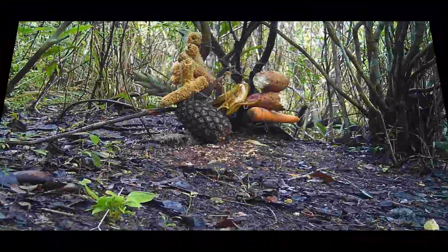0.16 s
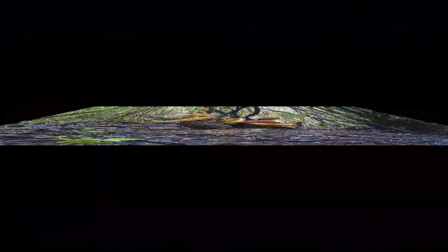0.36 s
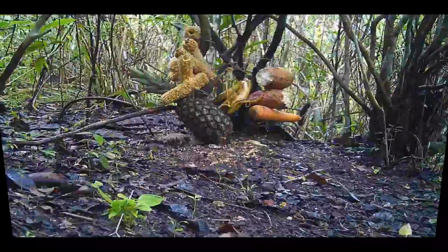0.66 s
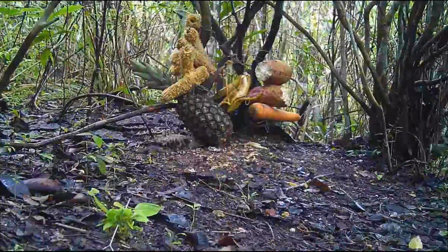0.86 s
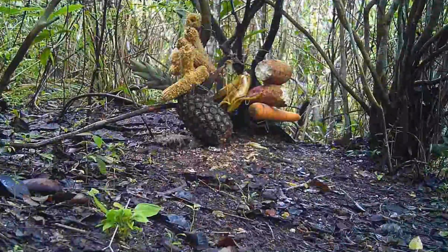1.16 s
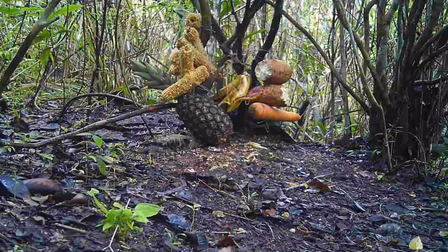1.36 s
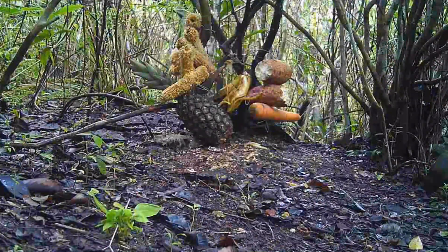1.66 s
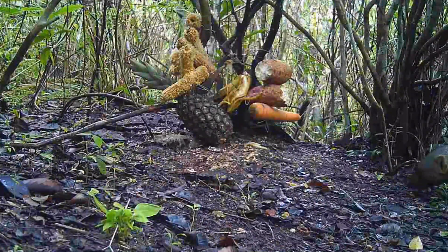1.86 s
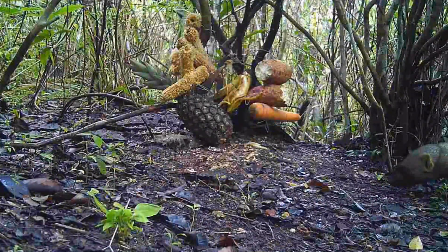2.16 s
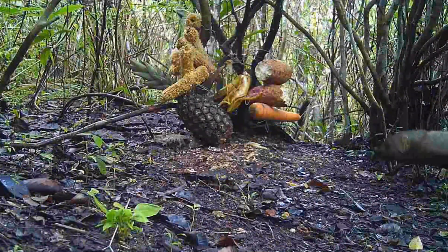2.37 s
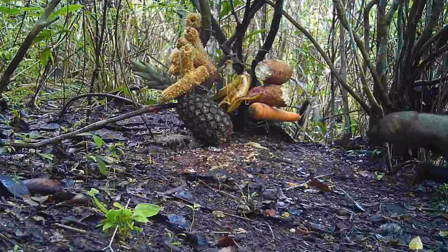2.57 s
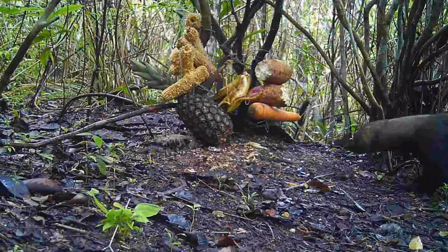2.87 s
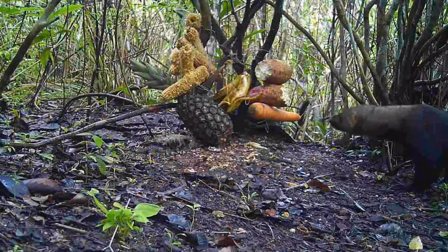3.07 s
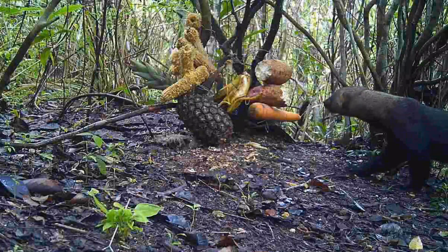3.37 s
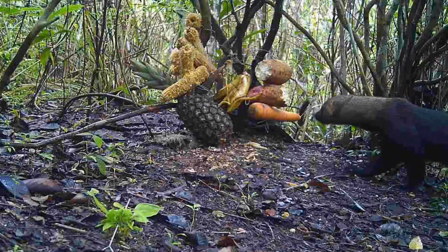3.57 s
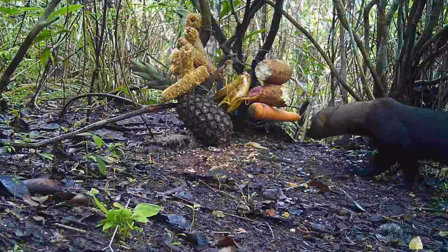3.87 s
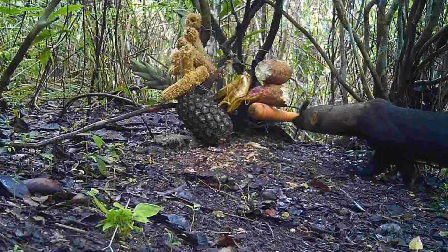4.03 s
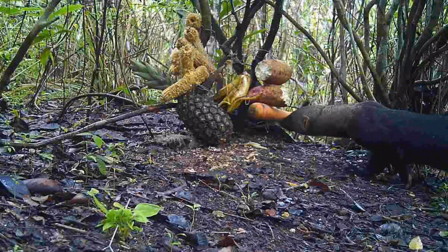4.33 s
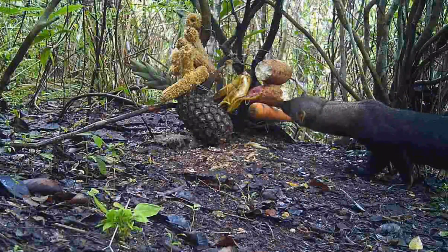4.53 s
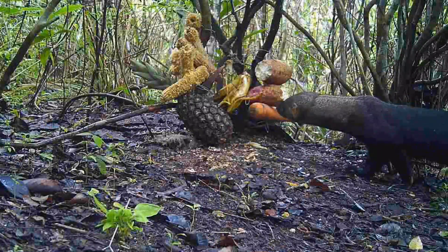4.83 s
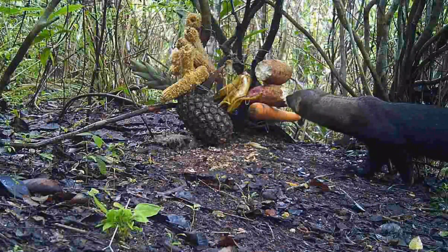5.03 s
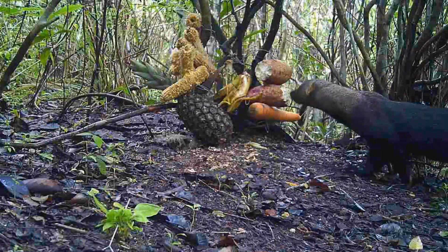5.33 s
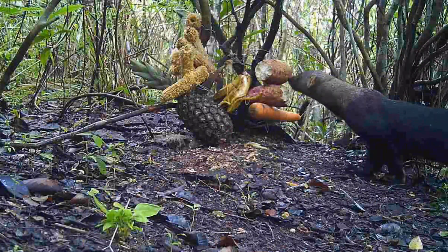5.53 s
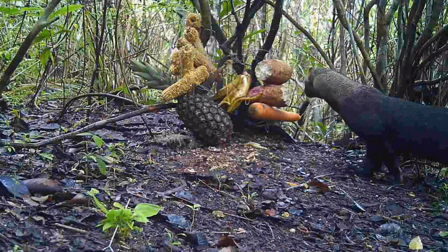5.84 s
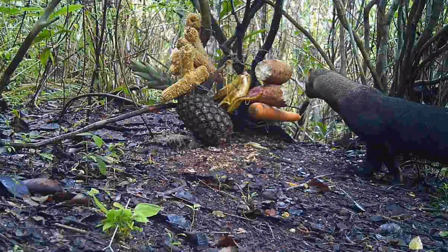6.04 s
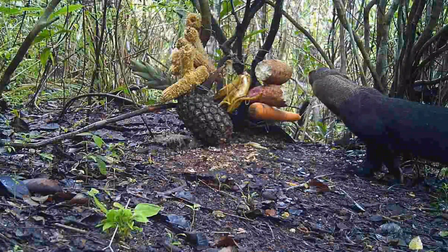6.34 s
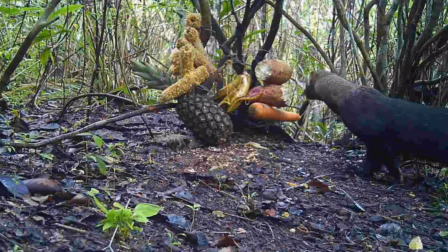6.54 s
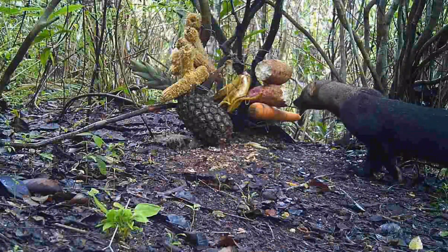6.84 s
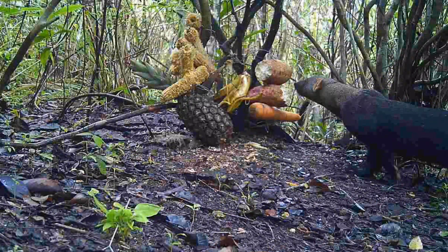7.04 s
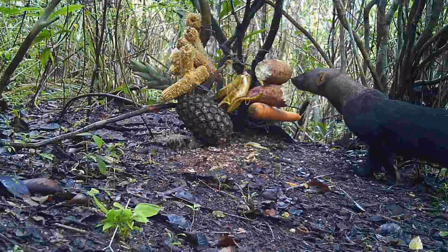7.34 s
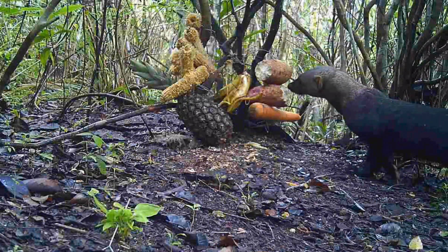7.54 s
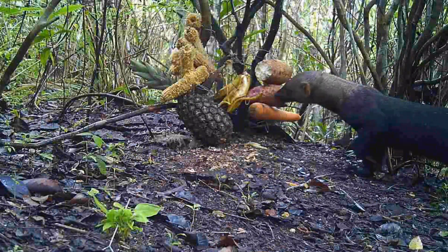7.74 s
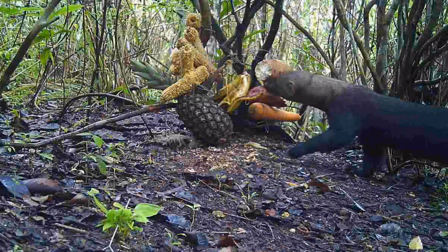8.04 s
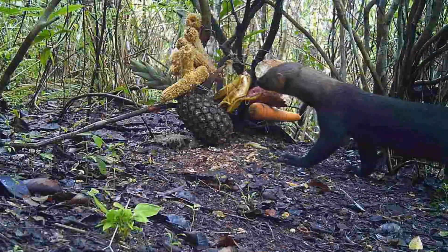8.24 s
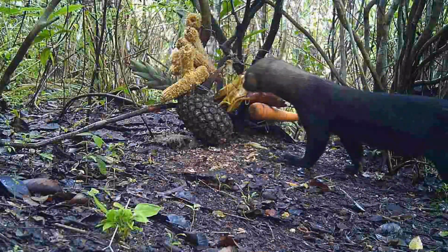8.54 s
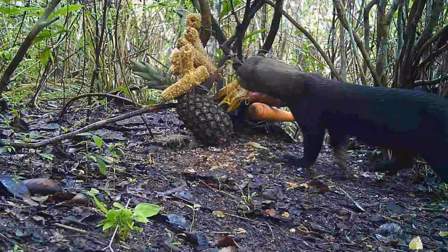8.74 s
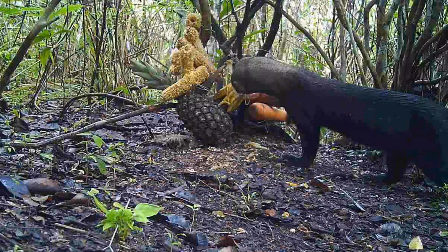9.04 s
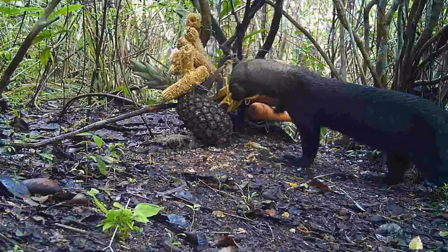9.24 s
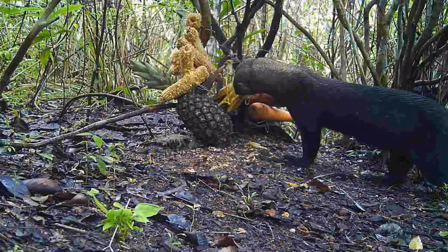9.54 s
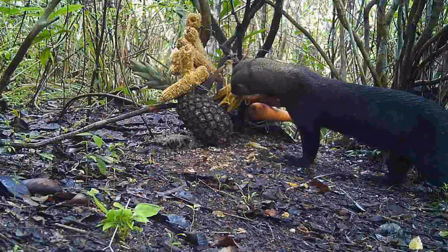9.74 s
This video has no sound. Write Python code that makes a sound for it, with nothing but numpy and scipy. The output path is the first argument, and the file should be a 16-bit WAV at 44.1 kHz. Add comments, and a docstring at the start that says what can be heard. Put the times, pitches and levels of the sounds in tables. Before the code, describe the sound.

Outdoor woodland ambience heard by a small, slightly hissy fixed microphone near the ground. Dense crickets shimmer and pulse irregularly without pause, above a soft low engine drone. Brief falling bird chips, tiny high squeaks and thin katydid buzzes appear in the opening seconds; light leaf crackles and dry twig ticks follow as an animal comes to feed. Late on, one bright descending whistle stands out, then a chip and more ticks.

```python
"""A forest floor. From the start a far engine hums over low rumble, the microphone hisses and a chorus of
crickets throbs near 3 kHz: sums of sines, shaped noise, and noise bursts ringing resonators.
At once a low bird chip and a faint falling whistle sound as gliding sines, and a thin buzz of harmonics
begins to pulse twice a second. A katydid buzzes in the first seconds, clicks driving wing resonances.
Leaf litter then rustles in ringing grains, twigs snap in short modes, and late on a strong whistle falls."""
import sys
import numpy as np
from scipy import signal
from scipy.fft import rfft, irfft
from scipy.io import wavfile

SR = 44100
rng = np.random.default_rng(int(sys.argv[2]) if len(sys.argv) > 2 else 0)


def output_pcm(signal):
    """Save a mono or channel-first signal as 16-bit PCM at the path in sys.argv[1].

    Samples are clipped to [-1, 1] before scaling.
    """
    pcm = np.clip(np.atleast_2d(signal).T, -1, 1) * 32767
    wavfile.write(sys.argv[1], SR, np.round(pcm).astype(np.int16))


N = 436590
TIME = np.arange(N) / SR

# Slow course of the background: (time [s], level [dB])
BACKGROUND_LEVEL = [(0.0, -58.5), (0.55, -59.5), (1.62, -55.5), (2.81, -55.5), (3.53, -57), (7.58, -56.5),
                    (8.02, -55), (8.55, -57.5), (9.9, -57)]
# Engine orders: (multiple of the engine rate [-], relative level [dB])
ENGINE_ORDERS = [(2.5, -19), (3, -.5), (4, -21), (5, -23), (6, -26), (8, -31), (9, -35), (12, -39)]
# Relative density of the rumble: (frequency [Hz], density [dB per Hz])
RUMBLE_SPECTRUM = [(4.7, -47), (8.0, -3), (27, -2), (82, 0), (103, -5.5), (163, -16.5), (400, -36),
                   (520, -43), (880, -120)]
# Relative density of the hiss: (frequency [Hz], density [dB per Hz])
HISS_SPECTRUM = [(100, -9), (160, -5.5), (350, -14), (1000, -16.5), (2500, -21), (3800, -23.5),
                 (8000, -26.5), (14500, -26), (15700, -29)]
# Flutter of the treble hiss: (multiple of the flutter rate [-], depth [0-1])
FLUTTER_PARTS = [(1, .07), (2.0, .04), (3, .2), (4, .07), (6, .11), (16, .05)]
# Cricket singers: (frequency [Hz], ring T60 [s], mean pulse rate [1/s], relative level [dB])
CRICKET_SINGERS = [(2934, 0.014, 55, -10.5), (3073, 0.022, 57, -2.5), (3143, 0.042, 74, -6),
                   (3226, 0.061, 68, -7.5), (3266, 0.012, 90, -11.5)]
# Faint upper bands: (frequency [Hz], width of each resonance pass [Hz], level relative to the chorus [dB])
UPPER_BANDS = [(6000, 480, -23), (6500, 240, -25)]
# Groups of crickets: (swell rate [1/s], time of one crest [s], strength [-])
CHORUS_GROUPS = [(2.74, 4.948, 0.28), (2.859, 5.019, 0.32), (2.578, 4.969, 0.23), (2.299, 5.101, 0.16),
                 (2.475, 5.079, 0.14)]
# Loudest surges of the chorus: (time [s], added strength [-])
CHORUS_SURGES = [(.63, 0.38), (2.05, 0.25), (3.07, .2), (4.19, 0.32), (4.59, 0.32), (5.74, 0.27),
                 (6.39, 0.45), (6.79, 0.74), (7.47, 0.27), (7.89, 0.28), (8.16, 0.4), (8.57, 0.33),
                 (8.85, 0.4), (9.14, .6)]
# Low falling chips: (time [s], length [s], level [dB], lead-in level [dB])
BIRD_CHIPS = [(-.018, 0.046, -52, -60), (0.72, 0.048, -46, -60), (0.837, .055, -52.5, -66),
              (2.589, 0.051, -43, -56), (3.153, .045, -44.5, -54), (7.11, 0.068, -45.5, -63),
              (8.235, 0.062, -43.5, -58)]
# Long falling whistles: (time [s], peak level [dB], fade [dB/s])
BIRD_WHISTLES = [(.042, -50.5, 90), (7.886, -23.5, 122)]
# High squeaks: (time [s], length [s], first frequency [Hz], last frequency [Hz], level [dB])
BIRD_SQUEAKS = [(1.981, .04, 8900, 6300, -57), (1.998, 0.039, 8700, 6500, -52),
                (2.03, 0.033, 7000, 6000, -56), (4.223, .064, 9300, 5150, -45),
                (4.228, .016, 9460, 9660, -49), (7.868, .025, 7500, 7370, -47)]
# Harmonics of the thin buzz: (multiple of its pitch [-], level [dB])
THIN_HARMONICS = [(6, -74), (7, -70), (8, -77), (9, -71), (10, -72), (11, -78)]
# Katydid buzzes: (time [s], length [s], level [dB])
KATYDID_BUZZES = [(.07, .16, -68), (1.585, 0.12, -61), (1.998, 0.27, -63), (2.53, .22, -62.5),
                  (3.006, 0.15, -62)]
# Wing resonances: (frequency [Hz], width of each resonance pass [Hz], relative level [dB])
WING_RESONANCES = [(9650, 900, 2.5), (10300, 350, 5), (11800, 2000, -4)]
# Stirring of the leaf litter: (time [s], length [s], level [dB])
RUSTLES = [(1.33, 0.028, -55), (1.495, 0.048, -59), (1.568, 0.16, -57.5), (2.225, 0.093, -53.5),
           (2.656, 0.098, -56), (2.943, 0.046, -55), (3.17, 0.057, -50), (3.53, 0.07, -65),
           (4.526, 0.15, -57.5), (6.743, 0.084, -54), (6.914, 0.11, -58), (7.273, 0.067, -58),
           (7.678, 0.1, -58), (8.82, 0.068, -60), (9.513, .13, -58)]
# Dry leaf grains: (frequency [Hz], relative level [dB])
LEAF_SPECTRUM = [(1500, -11), (2500, -5), (4500, -4.5), (6300, -3), (8500, -7), (12000, -14)]
# Twig snaps: (time [s], relative peak level [dB], extra level of modes above 8 kHz [dB])
TWIG_SNAPS = [(1.4854, -35.5, -1), (1.6965, -33, -6), (3.2162, -24.5, 2), (6.0766, -41, -8),
              (8.133, -33, -0.5), (8.8433, -39, -5), (9.2292, -34.5, -6), (9.5721, -42, -3.0)]
# Modes of a twig: (frequency [Hz], relative level [dB], T60 [s])
TWIG_MODES = [(1450, -16, .01), (4600, -16, .004), (6100, -1.5, .006), (7200, -1.5, .006), (9200, -3, .006),
              (10600, -5, .005)]

ENGINE_HZ, FLUTTER_HZ = 26.24, 24.83
# The hum lies above the mean background, exaggerates its changes and fades in.
HUM_OVER_DB, HUM_FOLLOWS, HUM_START_DB, HUM_RISE_S = 19.5, 1.8, -27, 0.13
CHORUS_LOW_HZ, CHORUS_HIGH_HZ = 2838, 3430
# Level over the background; steady part of the chorus; narrowness of a swell
CHORUS_OVER_DB, CHORUS_BED, CHIRP_SHARPNESS = 10.5, 0.54, 3.4
SURGE_SPREAD_S = 0.034   # standard deviation of a Gaussian surge
WHISTLE_FROM_HZ, WHISTLE_TO_HZ, WHISTLE_SAG_S, WHISTLE_S = 7020, 4955, 0.38, 0.35
WHISTLE_ATTACK_S, WHISTLE_ONSET_DB = 0.059, -13.5
# A bend is how much a glide flattens towards its end.
CHIP_FROM_HZ, CHIP_TO_HZ, CHIP_BEND = 3000, 1985, 0.584
LEAD_IN_FROM_HZ, LEAD_IN_TO_HZ, LEAD_IN_BEND, LEAD_IN_S = 2100, 2300, 0.4, 0.027
SQUEAK_BEND = 1.8
THIN_HZ, THIN_EVERY_S, THIN_FIRST_S, THIN_S, THIN_HISS_DB = 666.5, 0.499, 0.025, 0.11, -65.5
TEETH_PER_S = 312.3
CRACKLES_PER_S, LEAF_BANDS, LITTER_BED_DB = 3500, 14, -62.0
FOREST_T60_S, FOREST_DB, CHORUS_FOREST_DB = 0.27, -0.5, -6.5
CUTOFF_HZ = 15700


def from_db(db):
    """Level and amplitude: 20 dB is a factor of ten in amplitude."""
    return 10 ** (np.asarray(db) / 20)


def rms_one(x):
    """Normalization: a signal divided by its root mean square has unit rms."""
    return x / np.sqrt(np.mean(x ** 2) + 1e-20)


def background_level():
    """Linear interpolation: the background level in dB at every sample."""
    s, level_db = np.transpose(BACKGROUND_LEVEL)
    return np.interp(TIME, s, level_db)


def drift(rate_hz):
    """Low-pass noise: two equal poles leave a slow random wander of unit spread."""
    step = 40   # samples between computed points
    r = np.exp(-2 * np.pi * rate_hz * step / SR)
    noise = rng.standard_normal(N // step + 2002)
    slow = signal.lfilter([1], [1, -2 * r, r * r], noise)[2000:]   # past the settling
    return np.interp(np.arange(N) / step, np.arange(len(slow)), rms_one(slow))


def ring(clicks, hz, t60):
    """Impulse response of a damped mode: a unit click starts a decaying sine of height 1."""
    r, w = from_db(-60 / (t60 * SR)), 2 * np.pi * hz / SR
    return signal.lfilter([0, np.sin(w)], [1, -2 * r * np.cos(w), r * r], clicks + 1e-18)


def resonance(x, hz, width_hz):
    """Resonance: a pole pair passes a band about its frequency with a peak gain of 1."""
    r = np.exp(-np.pi * width_hz / SR)
    poles = [1, -2 * r * np.cos(2 * np.pi * hz / SR), r * r]
    return signal.lfilter([(1 - r * r) / 2, 0, (r * r - 1) / 2], poles, x)


def double_resonance(x, hz, width_hz):
    """Cascaded resonance: a second pass steepens the skirts."""
    return resonance(resonance(x, hz, width_hz), hz, width_hz)


def coloured(spectrum):
    """Spectral shaping: white noise weighted in frequency gives steady coloured noise of unit rms."""
    hz, level_db = np.transpose(spectrum)
    log_hz = np.log(np.linspace(1, SR / 2, N // 2 + 1))
    gain = from_db(np.interp(log_hz, np.log(hz), level_db))
    return rms_one(irfft(rfft(rng.standard_normal(N)) * gain, N))


def pulse_train(per_s):
    """Phase accumulation: one click marks each completed cycle of a varying rate."""
    turns = np.floor(np.cumsum(per_s / SR) + rng.random())
    return np.diff(turns, prepend=0.).clip(0, 1)


def forest(x, tail_db):
    """Scattering: trunks and leaves return a dense decaying tail, richer in treble."""
    t = TIME[:round(FOREST_T60_S * SR)]
    tail = rng.standard_normal(len(t)) * from_db(-60 * t / FOREST_T60_S)
    tail = tail * np.clip(t / 0.008, 0, 1)
    tail = signal.sosfilt(signal.butter(1, 5000, "high", fs=SR, output="sos"), tail)
    tail = tail / np.sqrt(np.sum(tail ** 2))
    return x + from_db(tail_db) * signal.fftconvolve(x, tail)[:N]


def engine_hum(waver, level_db):
    """Periodic source: an engine radiates sines at orders of its rate, each wandering in level and phase."""
    turns = 2 * np.pi * ENGINE_HZ * TIME
    hum = 0
    for order, order_db in ENGINE_ORDERS:
        phase = order * turns + 0.8 * drift(3.3) + 2 * np.pi * rng.random()
        hum = hum + from_db(order_db + 0.51 * drift(4.8)) * np.sin(phase)
    mean_db = level_db.mean()
    hum_db = mean_db + HUM_OVER_DB + HUM_FOLLOWS * (level_db - mean_db)
    hum_db = hum_db + HUM_START_DB * np.exp(-TIME / HUM_RISE_S)
    return np.sqrt(2) * from_db(hum_db + 1.0 * waver + 1.0 * drift(2.6)) * hum


def rumble_and_hiss(waver, level_db):
    """Broadband noise: rumble and all the hiss waver together, and the treble hiss also flutters fast."""
    flutter = 1
    for multiple, depth in FLUTTER_PARTS:
        flutter = flutter + depth * np.sin(2 * np.pi * (multiple * FLUTTER_HZ * TIME + rng.random()))
    hiss = from_db(6.5) * coloured(HISS_SPECTRUM)
    treble = signal.sosfiltfilt(signal.butter(1, 5000, "high", fs=SR, output="sos"), hiss)
    rumble = from_db(16.0) * coloured(RUMBLE_SPECTRUM)
    low = (hiss - treble + rumble) * from_db(1.37 * waver)
    return from_db(level_db) * (low + treble * flutter * from_db(0.8 * waver))


def background(waver):
    """Superposition: engine hum, rumble and hiss add over one slow course of level."""
    level_db = background_level()
    return engine_hum(waver, level_db) + rumble_and_hiss(waver, level_db)


def chorus_swell():
    """Periodic envelopes: groups swell at unlike rates over a steady bed, with Gaussian surges added."""
    swell = CHORUS_BED
    for per_s, crest_s, strength in CHORUS_GROUPS:
        cycle = np.cos(2 * np.pi * per_s * (TIME - crest_s))
        swell = swell + strength * np.exp(CHIRP_SHARPNESS * (cycle - 1))
    for s, strength in CHORUS_SURGES:
        swell = swell + strength * np.exp(-0.5 * ((TIME - s) / SURGE_SPREAD_S) ** 2)
    return swell


def crickets():
    """Stridulation: soft wing strokes of noise ring each wing, and each singer swells and fades alone."""
    stroke = np.hanning(round(0.0097 * SR))
    chorus = 0
    for hz, t60, per_s, level_db in CRICKET_SINGERS:
        strokes = np.convolve(pulse_train(per_s * (1 + 0.08 * drift(3))), stroke)[:N]
        song = ring((strokes + 0.33) * rng.standard_normal(N), hz, t60)
        chorus = chorus + from_db(level_db + 2.3 * drift(8.6)) * rms_one(song)
    # The wings radiate in one sharply bounded band.
    band = signal.butter(3, (CHORUS_LOW_HZ, CHORUS_HIGH_HZ), "band", fs=SR, output="sos")
    chorus = forest(signal.sosfilt(band, chorus), CHORUS_FOREST_DB)
    upper = 0
    for hz, width, level_db in UPPER_BANDS:
        song = double_resonance(rng.standard_normal(N), hz, width)
        upper = upper + from_db(level_db + 2.0 * drift(9.4)) * rms_one(song)
    gain = from_db(background_level() + CHORUS_OVER_DB)
    return gain * chorus_swell() * (rms_one(chorus) + upper)


def glide(s, length, from_hz, to_hz, bend, level_db):
    """Frequency modulation: a short sine glides fast, then flattens."""
    out = np.zeros(N)
    at = np.arange(max(round(s * SR), 0), round((s + length) * SR))
    part = np.clip((TIME[at] - s) / length, 0, 1)
    hz = from_hz + (to_hz - from_hz) * np.expm1(-bend * part) / np.expm1(-bend)
    envelope = np.abs(np.sin(np.pi * part)) ** 0.49
    out[at] = np.sqrt(2) * from_db(level_db) * envelope * np.sin(2 * np.pi * np.cumsum(hz) / SR)
    return out


def chips_and_squeaks():
    """Amplitude modulation: rapid random level changes make short gliding notes a little hoarse."""
    notes = 0
    for s, length, level_db, lead_in_db in BIRD_CHIPS:
        notes = notes + glide(s, length, CHIP_FROM_HZ, CHIP_TO_HZ, CHIP_BEND, level_db)
        # A soft rising note leads into each chip.
        notes = notes + glide(s - LEAD_IN_S, LEAD_IN_S, LEAD_IN_FROM_HZ, LEAD_IN_TO_HZ,
                              LEAD_IN_BEND, lead_in_db)
    for s, length, from_hz, to_hz, level_db in BIRD_SQUEAKS:
        notes = notes + glide(s, length, from_hz, to_hz, SQUEAK_BEND, level_db)
    return notes * from_db(3.0 * drift(90))


def whistles():
    """Exponential glide: a near sine sags in pitch, fades, and carries a faint octave."""
    out = 0
    for s, peak_db, fade_db in BIRD_WHISTLES:
        age = (TIME - s).clip(0)
        hz = WHISTLE_TO_HZ + (WHISTLE_FROM_HZ - WHISTLE_TO_HZ) * np.exp(-age / WHISTLE_SAG_S)
        phase = 2 * np.pi * np.cumsum(hz) / SR
        attack_db = np.interp(age, [0, WHISTLE_ATTACK_S], [WHISTLE_ONSET_DB, 0])
        level_db = peak_db + attack_db - fade_db * (age - WHISTLE_ATTACK_S).clip(0)
        edge = np.interp(TIME - s, [-0.006, 0, WHISTLE_S, WHISTLE_S + 0.007], [0, 1, 1, 0])
        out = out + np.sqrt(2) * edge * from_db(level_db + 2.3 * drift(51)) * np.sin(phase)
        # The octave fades more slowly than the note.
        out = out + edge * from_db(0.5 * level_db - 47) * np.sin(2 * phase)
    return out


def birds():
    """Superposition: small birds' chips, squeaks and whistles add as near sines."""
    return chips_and_squeaks() + whistles()


def thin_buzz():
    """Harmonic series: upper multiples of one pitch, with a puff of hiss, pulse at a steady beat."""
    age = (TIME - THIN_FIRST_S) % THIN_EVERY_S
    gate = np.interp(age, [0, 0.015, THIN_S - 0.015, THIN_S], [0, 1, 1, 0])
    tone = 0
    for multiple, level_db in THIN_HARMONICS:
        tone = tone + from_db(level_db) * np.sin(2 * np.pi * (multiple * THIN_HZ * TIME + rng.random()))
    puff = rms_one(resonance(rng.standard_normal(N), 5700, 4000))
    return gate * from_db(2.0 * drift(4.8)) * (np.sqrt(2) * tone + from_db(THIN_HISS_DB) * puff)


def katydid():
    """Stridulation: a file's near-steady, partly noisy tooth strikes excite the wing resonances."""
    gate = 0
    for s, length, level_db in KATYDID_BUZZES:
        edges = [s, s + 0.013, s + length - 0.01, s + length]
        gate = gate + from_db(level_db) * np.interp(TIME, edges, [0, 1, 1, 0])
    teeth = pulse_train(TEETH_PER_S * (1 + 0.003 * drift(8)))
    teeth = teeth + 0.22 * np.convolve(teeth, np.hanning(40))[:N] * rng.standard_normal(N)
    buzz = 0
    for hz, width, level_db in WING_RESONANCES:
        buzz = buzz + from_db(level_db) * double_resonance(teeth, hz, width)
    return gate * rms_one(buzz)


def leaf_rustle():
    """Granular excitation: dense random crackles ring dry leaves, strongest where they are stirred."""
    sizes = from_db(3.6 * np.minimum(rng.exponential(1, N), 4)) * rng.choice([-1, 1], N)
    born = rng.random(N) < CRACKLES_PER_S / SR * from_db(3.0 * drift(25))
    band_of_grain = rng.integers(0, LEAF_BANDS, N)
    leaf_hz, leaf_db = np.transpose(LEAF_SPECTRUM)
    leaves = 0
    for band, hz in enumerate(np.geomspace(leaf_hz[0], leaf_hz[-1], LEAF_BANDS)):
        grains = ring(sizes * born * (band_of_grain == band), hz, 4.0 / hz)
        leaves = leaves + from_db(np.interp(hz, leaf_hz, leaf_db)) * rms_one(grains)
    stir = 0
    for s, length, level_db in RUSTLES:
        edges = [s, s + 0.19 * length, s + 0.91 * length, s + length]
        stir = stir + from_db(level_db) * np.interp(TIME, edges, [0, 1, 1, 0])
    return (stir + from_db(LITTER_BED_DB)) * rms_one(leaves)   # a faint crackle never stops


def twig_snaps():
    """Modal excitation: each snap strikes one shared set of short damped modes."""
    soft = signal.butter(4, 12000, fs=SR, output="sos")   # the break is not quite instant
    s, peak_db, treble_db = np.transpose(TWIG_SNAPS)
    out = 0
    for hz, level_db, t60 in TWIG_MODES:
        clicks = np.zeros(N)
        clicks[(s * SR).astype(int)] = from_db(peak_db + level_db - 0.5 + treble_db * (hz > 8000))
        out = out + ring(signal.sosfilt(soft, clicks), hz, t60)
    return out


def litter():
    """Superposition: an animal's rustling of leaves and snapping of twigs add."""
    return leaf_rustle() + twig_snaps()


def scene():
    """Shared modulation: hum, low noise, treble hiss and crickets waver together, quickly and at random."""
    waver = 0.96 * drift(18.7) + 0.6 * drift(5.9)   # [dB] before each layer's own factor
    wavering = background(waver) + from_db(1.2 * waver) * crickets()
    among_trees = forest(birds() + katydid(), FOREST_DB)
    return (wavering + among_trees + thin_buzz() + litter())[None]


def record(dry):
    """Band limiting: a steep low-pass filter removes the top of the spectrum."""
    return signal.sosfilt(signal.ellip(20, 0.3, 80, CUTOFF_HZ, fs=SR, output="sos"), dry)


dry = scene()
out = record(dry)
output_pcm(out)
```